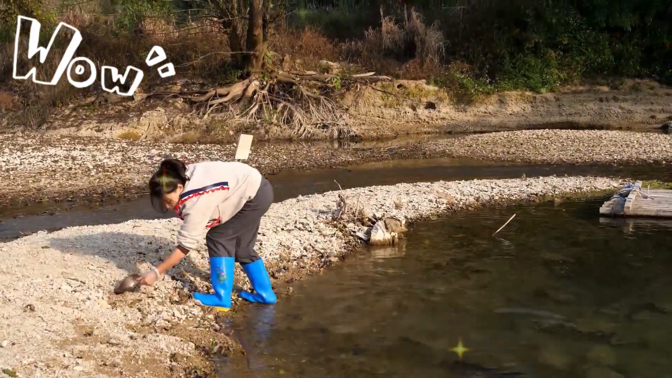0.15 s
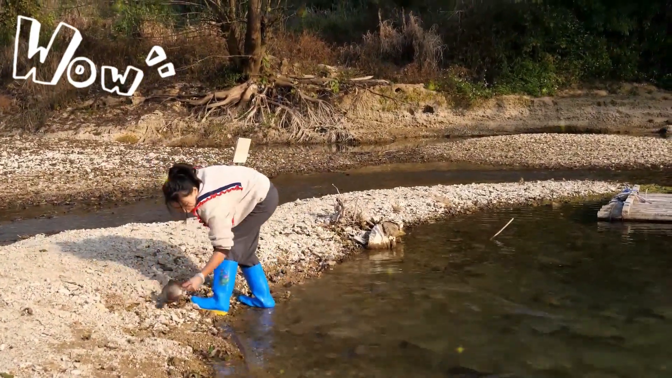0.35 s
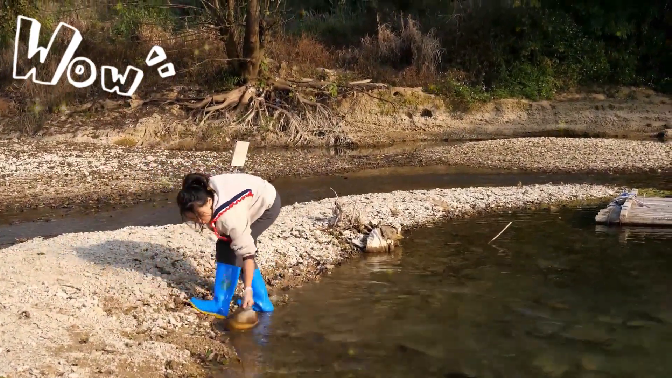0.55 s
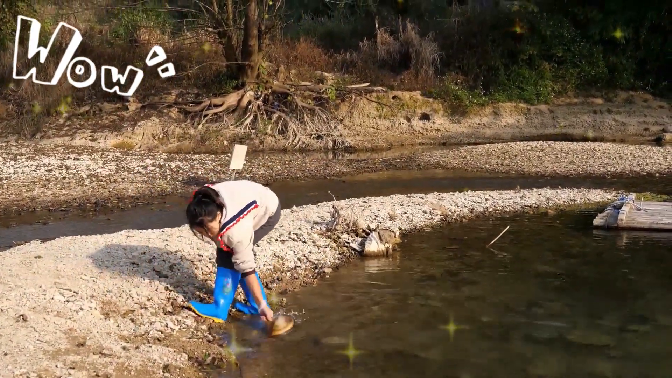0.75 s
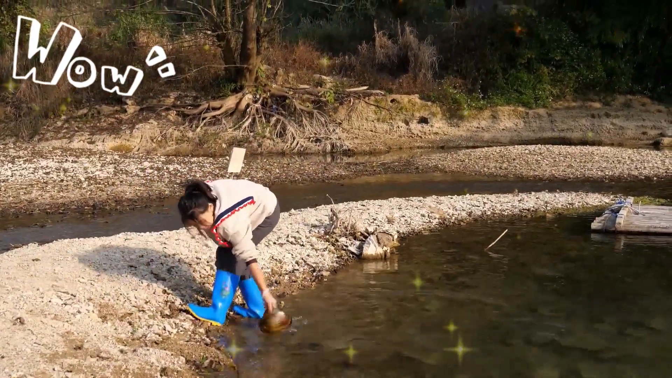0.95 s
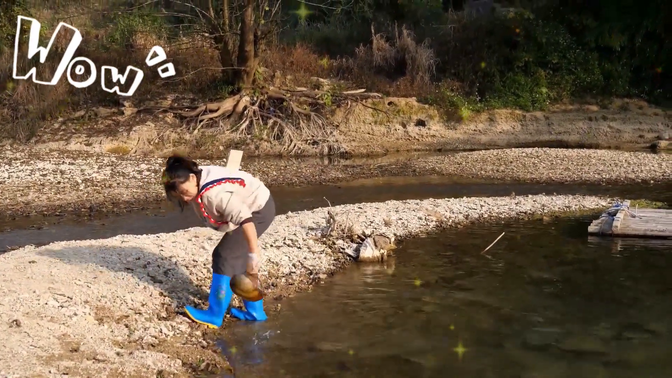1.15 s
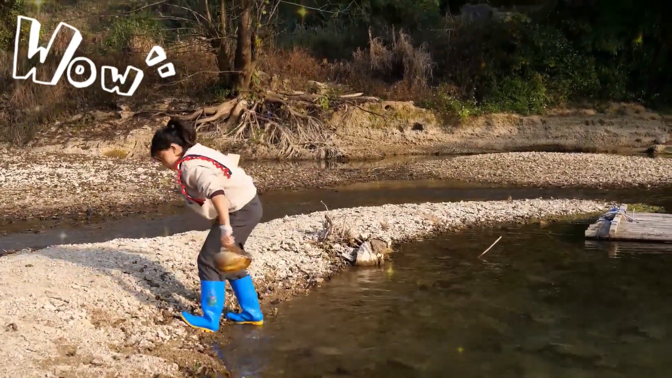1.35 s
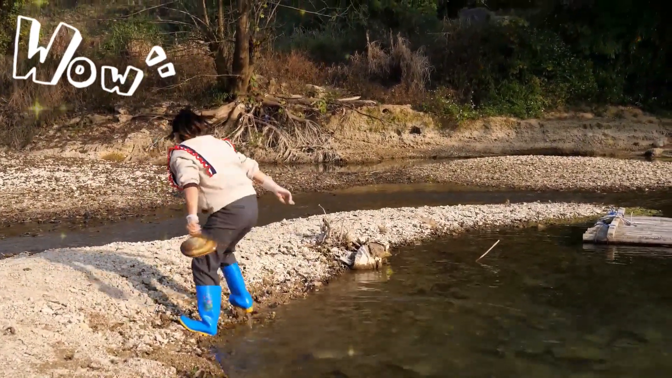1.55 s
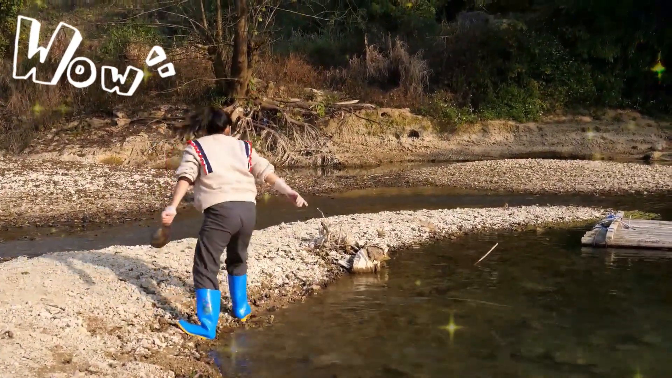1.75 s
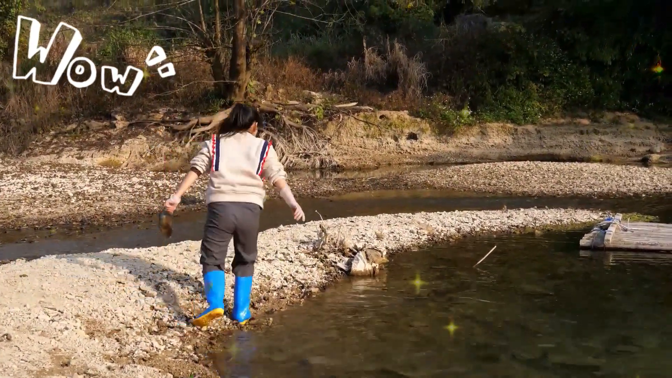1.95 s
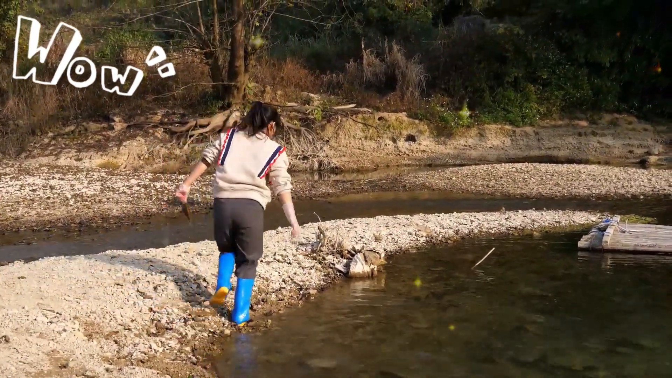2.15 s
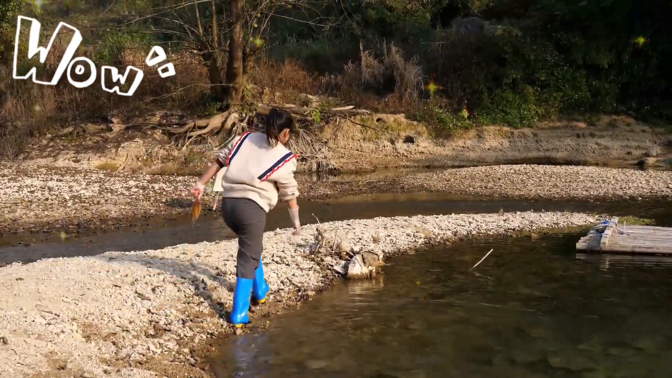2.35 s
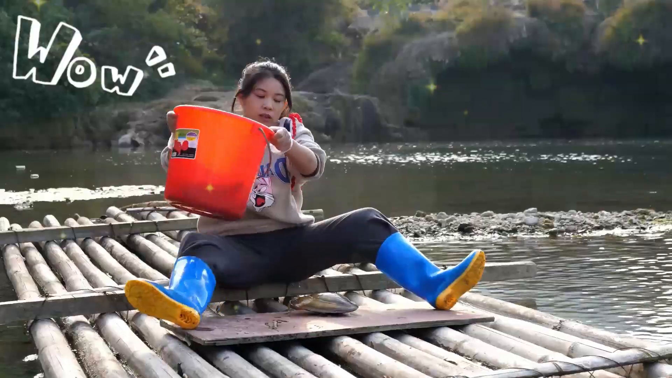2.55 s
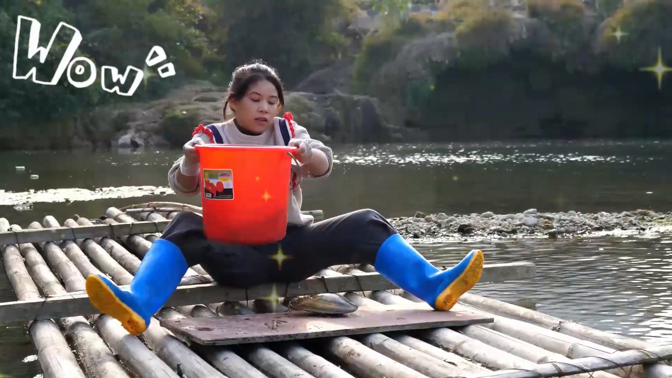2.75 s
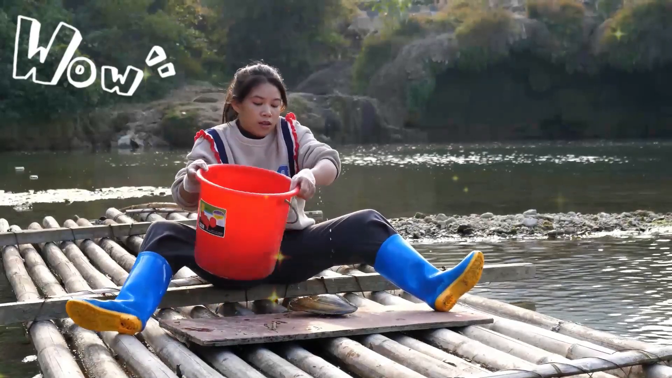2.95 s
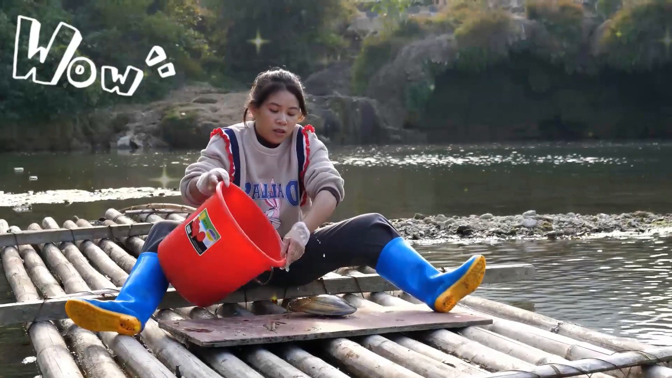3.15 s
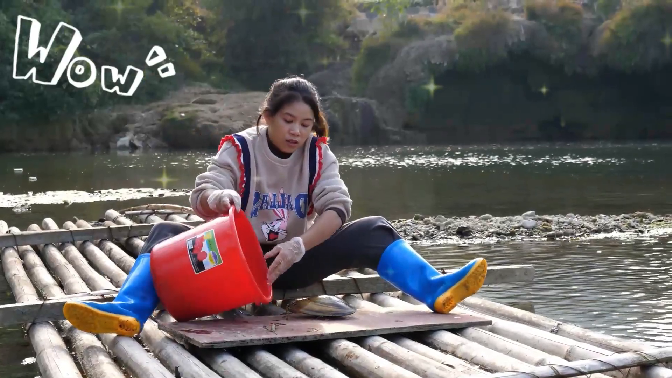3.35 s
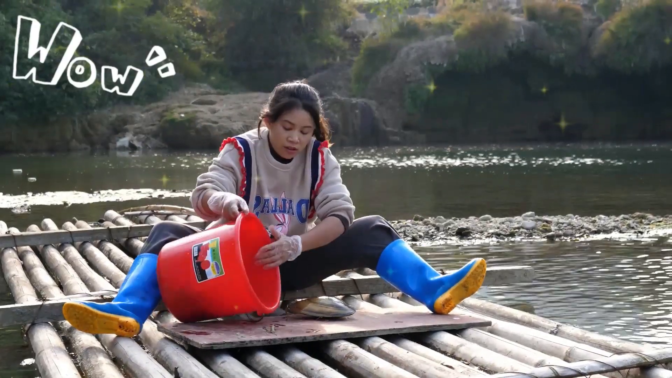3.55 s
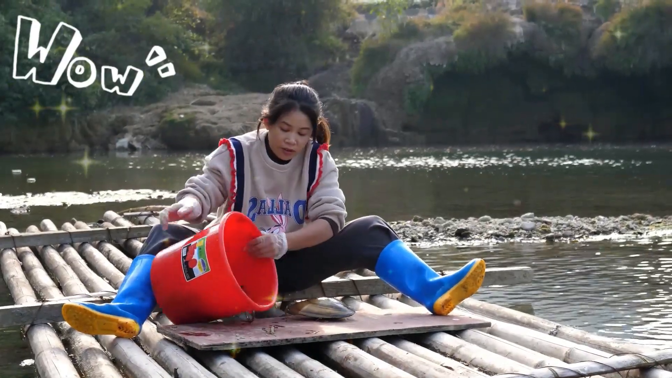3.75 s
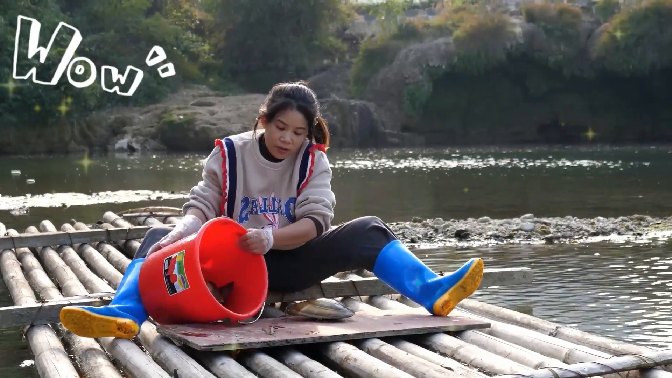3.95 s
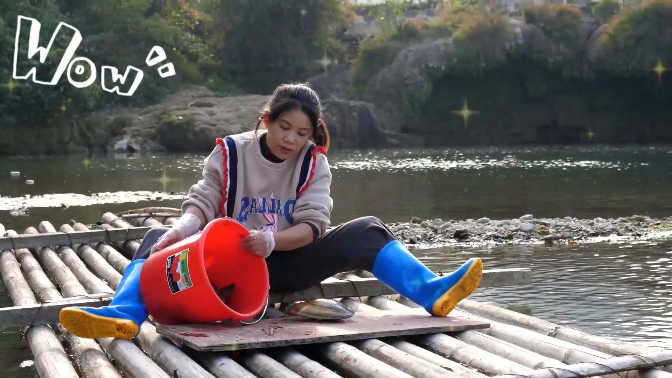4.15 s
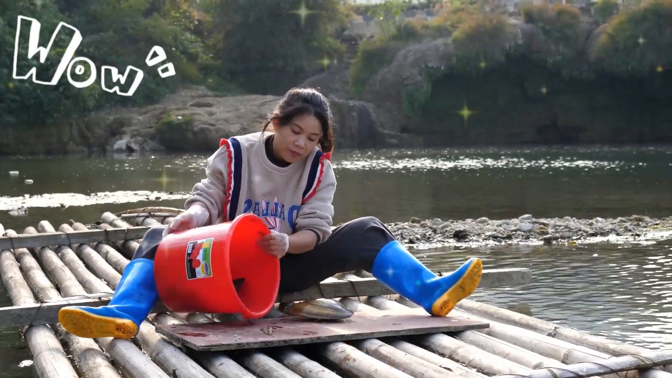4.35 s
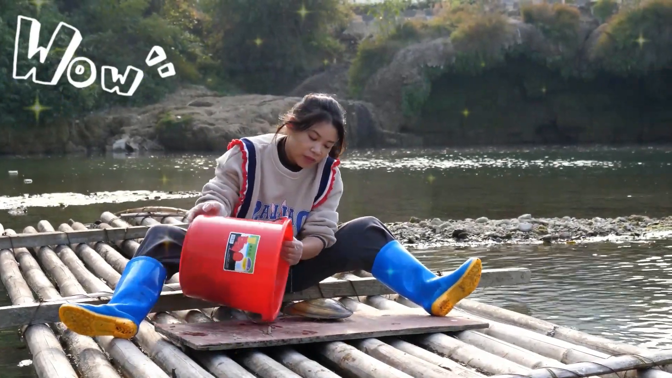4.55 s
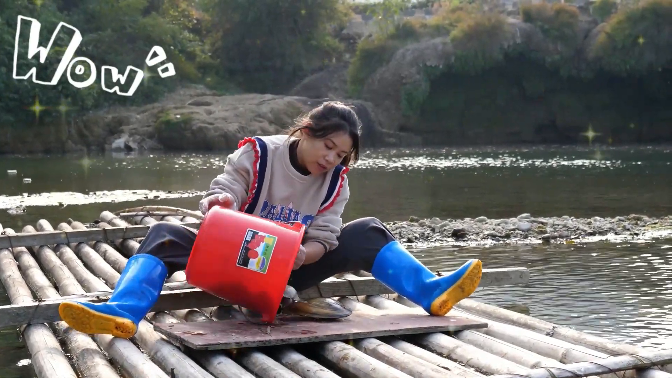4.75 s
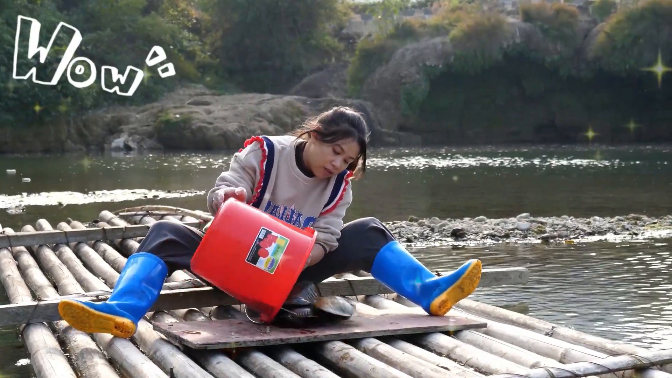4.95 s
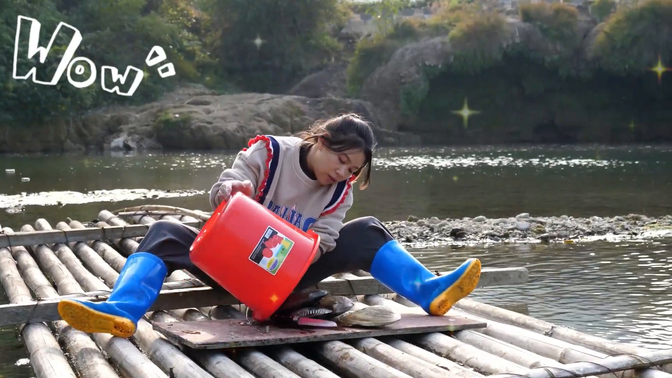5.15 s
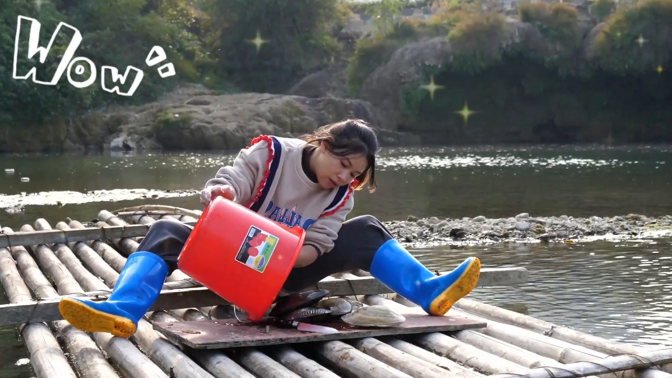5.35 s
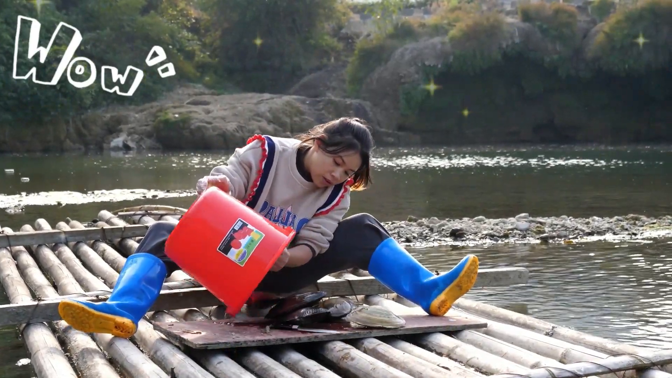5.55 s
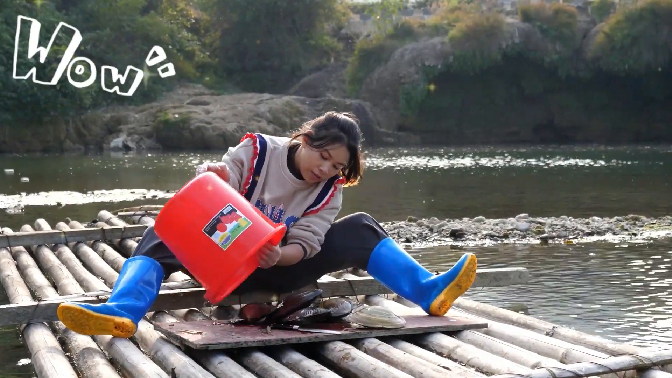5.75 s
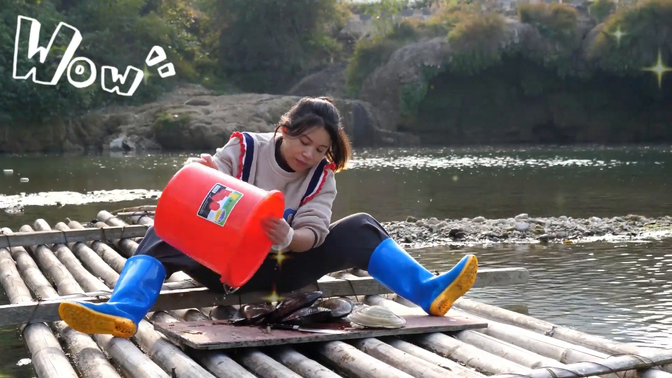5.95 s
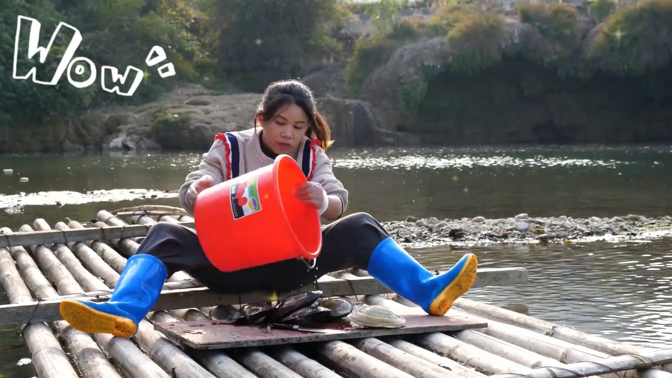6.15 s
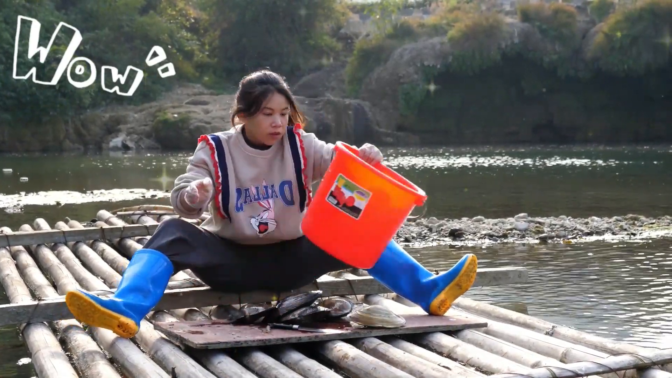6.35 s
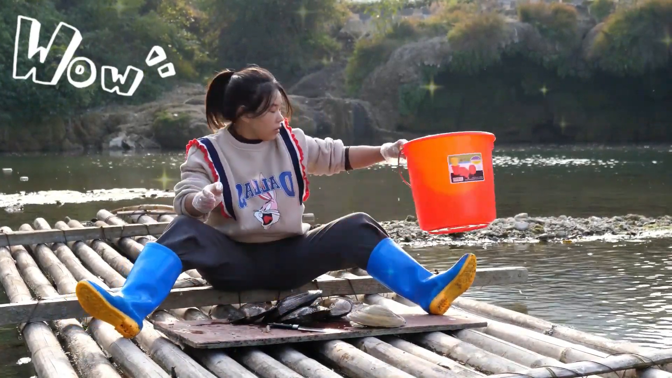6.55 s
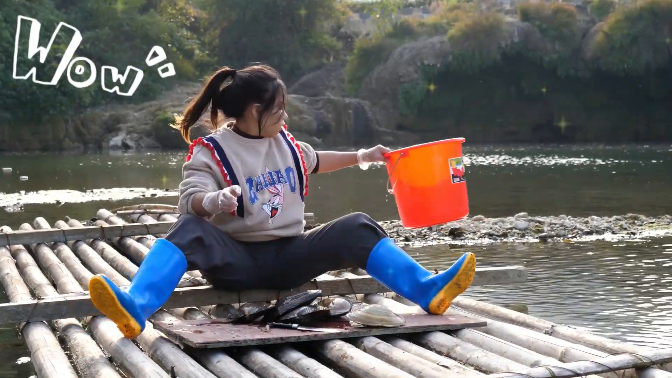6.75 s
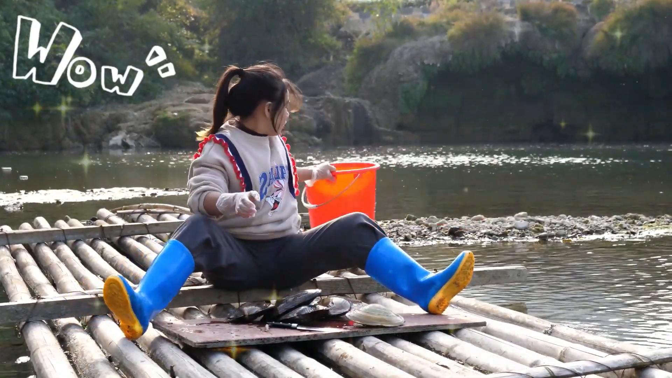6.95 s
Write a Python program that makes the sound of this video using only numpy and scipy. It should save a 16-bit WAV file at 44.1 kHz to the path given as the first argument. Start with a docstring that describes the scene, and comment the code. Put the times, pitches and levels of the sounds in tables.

```python
"""A river hisses softly throughout: bands of noise. At first a breeze rumbles on the microphone as low noise,
boots shift in wet gravel (grains exciting stone resonances), drops ring as bubbles with rising pitch,
and single pebbles click as puffs of noise. Then, on a bamboo raft, big mussel shells slide (swelling hiss)
and knock in a plastic bucket and tumble onto a wooden board: runs of contacts strike the modes of bucket,
board and shells. The last knocks ring the emptied bucket."""
import sys
import numpy as np
from scipy import signal
from scipy.io import wavfile

SR = 44100
rng = np.random.default_rng(int(sys.argv[2]) if len(sys.argv) > 2 else 0)


def pcm_store(signal):
    """Save signal as 16-bit PCM."""
    levels = np.round(np.clip(np.atleast_2d(signal), -1, 1) * 32767)
    wavfile.write(sys.argv[1], SR, levels.astype(np.int16).T)


N = 313096

# Ends of the handling stages in seconds: lifted, tilted on the knee, rim on the board, pouring;
# after the last the bucket is swung away empty.
STAGE_ENDS = (3.1, 4.4, 4.85, 6.2)


def from_db(db):
    """Logarithmic level: decibels become an amplitude gain."""
    return 10 ** (np.asarray(db) / 20)


def rms_one(x):
    """Normalisation: the signal is scaled to an rms of 1."""
    return x / np.sqrt(np.mean(x ** 2) + 1e-20)


def gains(tables):
    """Level envelopes: dB columns are interpolated in time and become gains, all but silent outside each table."""
    t = np.arange(N) / SR
    total = 0
    for table in tables:
        s, *columns = np.transpose(table)
        total = total + np.array([from_db(np.interp(t, s, column, -120, -120)) for column in columns])
    return total


def at_hz(points, hz):
    """Spectral interpolation: a curve is read on a log-frequency axis."""
    table_hz, values = np.array(points)[:, 0], np.array(points)[:, 1]
    return np.interp(np.log(hz), np.log(table_hz), values)


def sides(balance_db):
    """Intensity stereo: a level difference, left over right, becomes two gains."""
    return from_db(np.array([[.5], [-.5]]) * balance_db)


def band_pass(x, order, band_hz):
    """Band limitation: only the range between two frequencies passes."""
    return signal.sosfilt(signal.butter(order, band_hz, "band", fs=SR, output="sos"), x)


def resonance(x, hz, width_hz):
    """Driven resonator: a two-pole band-pass of gain 1 at its top."""
    r = np.exp(-np.pi * width_hz / SR)
    return signal.lfilter(np.array([1, 0, -1]) * (1 - r * r) / 2, [1, -2 * r * np.cos(2 * np.pi * hz / SR), r * r], x)


def ring(clicks, hz, t60):
    """Impulse response of a damped mode: a unit click starts a dying sine of initial height 1."""
    r = from_db(-60 / (max(t60, .001) * SR))
    w = 2 * np.pi * hz / SR
    return signal.lfilter([0, np.sin(w)], [1, -2 * r * np.cos(w), r * r], clicks + 1e-18)


def touches(per_s, uneven_db):
    """Poisson-like contacts: random sample indices and signed sizes of rms 1."""
    at = np.flatnonzero(rng.random(N) < per_s / SR)
    sizes = from_db(uneven_db * np.minimum(rng.exponential(1, N), 4)) * rng.choice([-1, 1], N)
    return at, rms_one(sizes[at])


def drift(rate):
    """Low-passed noise: a slow random curve of rms 1, its bandwidth set by the rate in Hz."""
    step = 40   # samples between computed points
    r = np.exp(-2 * np.pi * step * rate / SR)
    slow = signal.lfilter([1], [1, -2 * r, r * r], rng.standard_normal(N // step + 2002))[2000:]
    return np.interp(np.arange(N) / step, np.arange(len(slow)), rms_one(slow))


def banded_noise(spectrum, top_hz, patchy_db, rate):
    """Partly coherent noise: half-octave bands with own level, flicker and left-right likeness; rms 1."""
    # Left-right likeness. Each row: frequency in Hz, correlation of the sides (1 is alike).
    likeness = [(60, 0.99), (180, 1), (550, 0.98), (1650, 0.42), (4970, 0.76), (15000, 0.79)]
    out, together = 0, drift(rate / 4)
    edges = 28 * 2 ** np.arange(0, 9.6, .5)
    white = rng.standard_normal((2, 2, N))
    for k, low in enumerate(edges[edges < top_hz]):
        # neighbouring bands use different noise
        mid, side = band_pass(white[k % 2], 2, [low, min(low * np.sqrt(2), .45 * SR)])
        hz = low * 2 ** .25
        alike = np.clip(at_hz(likeness, hz), -1, 1)
        gain = from_db(at_hz(spectrum, hz) + patchy_db * (.5 * together + drift(rate)))
        out = out + gain * (np.sqrt(1 + alike) * mid + np.sqrt(1 - alike) * side * [[1], [-1]])
    return rms_one(out)


def river():
    """Broadband flow noise: a soft hiss whose bands flicker slightly."""
    # River spectrum. Each row: frequency in Hz, level in dB per Hz (relative).
    river_colour = [(40, -48), (101, -8.5), (198, -10), (275, -7), (476, -12), (567, -7), (1430, -8),
                    (3800, -15.5), (14700, -28), (15800, -53)]
    return from_db(-58) * banded_noise(river_colour, top_hz=16000, patchy_db=.9, rate=24)


def breeze():
    """Wind noise: low-frequency pressure flutter at the microphone, rising and falling in gusts."""
    # Gust envelope. Each row: time in seconds, level in dB.
    gusts = [(0.0, -58.5), (0.17, -72), (0.5, -54), (1.44, -57.5), (1.46, -50.5), (2.01, -54),
             (2.29, -49.5), (2.47, -60.5), (2.51, -48), (2.7, -86)]
    # Wind spectrum. Each row: frequency in Hz, level in dB per Hz (relative).
    wind_colour = [(15, -61), (25, -25), (49, -13), (107, 4), (154, 6.5), (307, -27.5), (425, -7),
                   (500, -17)]
    return gains([gusts])[0] * banded_noise(wind_colour, top_hz=500, patchy_db=2.5, rate=23.0)


def tread():
    """Exponential pressing and release: crunch and grit gains swell, hold and fade over a faint shuffle."""
    # Boots pressing into wet gravel. Each row: start in seconds, hold in seconds,
    # crunch in dB before the gain of the gravel, grit in dB re crunch.
    steps = [(0.0, 0.0039, -51, -2), (0.678, 0.12, -57.5, -5.5), (1.033, 0.036, -41.5, -20),
             (1.053, 0.013, -52, 1), (1.13, 0.0044, -46, -24), (1.25, 0.11, -53, -11),
             (1.51, 0.011, -50.5, -9), (1.859, 0.026, -43.5, -14), (2.077, 0.0088, -50, 1.5),
             (2.121, 0.005, -43.5, -2.5)]
    # The stones never quite rest while the boots shift: start and end in seconds.
    shuffle_start, shuffle_end = (.6, 2.45)
    shuffle = (shuffle_start, shuffle_end - shuffle_start, -61, -12)
    press_db_per_s, lift_db_per_s = 700, 246   # swell before and fading after each hold
    t, power = np.arange(N) / SR, np.zeros((2, N))
    for s, hold, level_db, grit_db in [*steps, shuffle]:
        shape_db = -press_db_per_s * np.maximum(s - t, 0) - lift_db_per_s * np.maximum(t - s - hold, 0)
        power += from_db(np.maximum(shape_db, -200) + level_db + np.array([[0], [grit_db]])) ** 2
    return np.sqrt(power)


def gravel():
    """Granular excitation: dense grains set many short stone resonances ringing, dull crunch and bright grit."""
    out = 0
    # lowest and highest stone Hz, grains per s, cycles a stone rings down 60 dB
    layers = [(1010, 2260, 2500, 5.5), (2900, 12100, 3500, 6.4)]
    for gain, (low_hz, high_hz, per_s, cycles) in zip(tread(), layers):
        at, sizes = touches(per_s=per_s, uneven_db=4.5)
        dealt, layer = rng.integers(0, 12, len(at)), 0
        for k, hz in enumerate(np.geomspace(low_hz, high_hz, 12)):
            clicks = np.zeros(N)
            clicks[at[dealt == k]] = sizes[dealt == k]
            # small stones ring briefly but sharply
            layer = layer + (hz / low_hz) ** 1.12 * ring(clicks, hz, cycles / hz)
        out = out + gain * rms_one(band_pass(layer, 2, [low_hz * .7, high_hz * 1.15]))
    return from_db(1.5) * out


def drips():
    """Bubble resonance: a drop traps a bubble whose pitch rises as it dies; the broken surface roughens it."""
    # Drops and small splashes. Each row: start in seconds, bubble level in dB before the bank filter,
    # starting pitch in Hz, decay by 60 dB in seconds (at least 0.004 s is used).
    drops = [(0.063, -34, 2350, 0.013), (0.069, -36, 2040, 0.016), (0.077, -34.5, 1870, 0.024),
             (0.736, -45, 1420, 0.069), (0.764, -36.5, 1450, 0.025), (0.807, -43, 1400, 0.054),
             (0.833, -35.5, 1240, 0.014), (0.919, -46, 677, 0.069), (0.931, -49, 1310, 0.18),
             (0.968, -51.5, 548, 0.14), (1.008, -31.5, 1045, 0.12), (1.089, -45.5, 500, 0.11),
             (1.037, -32, 2500, 0.027), (1.044, -34, 2450, 0.021), (1.011, -31.5, 1370, 0.069),
             (1.055, -35, 1450, 0.02), (1.066, -41, 4200, .015), (1.07, -40, 7050, 0.016),
             (1.075, -42, 7040, 0.013), (1.093, -36.5, 3010, 0.03), (1.139, -30.5, 2230, 0.017),
             (1.14, -35.5, 1020, 0.022), (1.24, -47.5, 1150, 0.066), (1.257, -36.5, 3000, 0.02),
             (1.277, -38.5, 2900, 0.022), (1.351, -45, 1360, 0.061), (1.697, -47, 1810, 0.03),
             (2.0, -40, 530, 0.037), (2.335, -43, 703, 0.067)]
    out, t = np.zeros(N), np.arange(4000) / SR
    for (s, level_db, hz, t60), noise in zip(drops, rng.standard_normal((len(drops), 4000))):
        rough = 1 + 0.035 * rms_one(signal.lfilter([1], [1, -.9], noise))
        bubble = np.sin(2 * np.pi * hz * t * (1 + 1.66 * t))
        # a 6 ms tick, 15 dB below the bubble, as the drop breaks the surface
        tick = from_db(level_db - 15 - 60 * t / .006) * noise
        i = round(s * SR)
        out[i:i + 4000] += tick + from_db(level_db - 60 * t / max(t60, .004)) * rough * bubble
    return out


def pebbles():
    """Damped impact noise: each click is a puff of noise a few ms long around the stone's pitch."""
    # Single pebbles. Each row: start in seconds, peak in dB before the bank colouring, centre in Hz.
    clicks = [(0.065, -43.5, 3100), (0.685, -37.5, 3420), (1.14, -44, 2570), (1.207, -43, 2480),
              (1.226, -41, 7240), (1.399, -31.5, 6330), (1.521, -45, 2450), (1.549, -28.5, 6700),
              (1.6775, -43, 7340), (1.81, -50, 5200), (1.939, -37, 6000), (1.964, -38.5, 9300),
              (2.069, -32.5, 3300), (2.0771, -32.5, 2420), (2.107, -38, 2520), (2.138, -25.5, 4370),
              (2.177, -43, 7090), (2.3302, -37.5, 2780)]
    out = np.zeros(N)
    for (s, level_db, hz), puff in zip(clicks, rng.standard_normal((len(clicks), 1200))):
        puff = puff * from_db(-60 * np.arange(1200) / SR / 0.019)   # 60 dB in 19 ms
        puff = band_pass(puff, 1, [hz / 1.31, min(hz * 1.25, 18000)])
        i = round(s * SR)
        out[i:i + 1200] += from_db(level_db) * puff / np.abs(puff).max()
    return out


def bank_colour(x):
    """Parallel resonators: fixed pitches stand out of the stone sounds from the bank."""
    # Resonance pitches in Hz, their shared width in Hz, their gain in dB.
    peaks_hz, width_hz, peak_db = (2390, 3230, 4580, 5460, 6370, 7120, 8420), 245, -0.5
    return x / 2 + from_db(peak_db) * sum(resonance(x, hz, width_hz) for hz in peaks_hz)


def slides():
    """Friction noise: a shell sliding along plastic hisses around one broad resonance, swelling and fading."""
    # Sliding shells. Each row: start in seconds, length in seconds, centre in Hz, width in octaves,
    # level in dB before the swell.
    strokes = [(2.472, 0.083, 1550, 1.35, -49), (2.504, 0.025, 3500, 3.5, -44), (3.263, 0.12, 1880, 1, -56),
               (4.505, 0.23, 1460, 0.83, -53), (3.66, .09, 7900, 1, -56.5),
               (4.003, 0.036, 8800, 0.49, -58.5), (5.321, 0.11, 3540, 0.26, -46)]
    out = np.zeros(N)
    for (s, length, hz, octaves, level_db), hiss in zip(strokes, rng.standard_normal((len(strokes), SR // 4))):
        half_width = 2 ** (octaves / 2)
        hiss = rms_one(band_pass(hiss, 2, [hz / half_width, min(hz * half_width, 16000)]))
        n, i = min(int(length * SR), SR // 4), round(s * SR)
        swell = np.sin(np.pi * np.sqrt(np.arange(n) / n))
        out[i:i + n] += from_db(level_db) * swell * hiss[:n]
    return out


def stage(s):
    """Changing boundary conditions: the six stage columns at given times."""
    # One row per handling stage. Each row: boom in dB re knock, boom pitch in Hz, low rattle pitch in Hz,
    # clacking rattle pitch in Hz and level in dB, octaves of board modes a knock reaches.
    stage_rows = [(-32, 127, 423, 1700, 3.5, 0.34), (-25.5, 188, 280, 1540, 5, 0.55),
                  (-17, 129, 500, 1650, 8, 0.61), (-33, 137.6, 485, 1240, 2.5, 0.26),
                  (-16.5, 147, 470, 1850, 5.5, 0.29)]
    return np.moveaxis(np.array(stage_rows)[np.searchsorted(STAGE_ENDS, s)], -1, 0)


def struck(modes, at, sizes, shell, pitches, near_hz, reach, spread_db):
    """Modal excitation: each contact drives most the modes near its spot's pitch; small shells lie higher."""
    # Stereo place of the shells. Each row: frequency in Hz, left over right in dB.
    shell_balance = [(130, 1.5), (400, 0.5), (1000, -0.6), (2200, -4), (4500, -4), (8000, 0.3)]
    out = np.zeros((2, N))
    for hz, level_db, t60 in modes:
        off_db = np.maximum(-6 * np.nan_to_num(np.log2(hz / near_hz) / reach) ** 2, -13.5)
        strength = sizes * from_db(level_db + off_db + spread_db * rng.standard_normal(len(at)))
        rung = 0
        for k, pitch in enumerate(pitches):
            mine, clicks = shell % len(pitches) == k, np.zeros(N)
            np.add.at(clicks, at[mine], strength[mine])
            rung = rung + ring(clicks, hz * pitch, t60)
        # a mode takes a cycle or two to swell
        out += resonance(rung, hz, 0.63 * hz) * sides(at_hz(shell_balance, hz))
    return out


def rims(cycles):
    """Dense high modes: short rim resonances, evenly spread in log pitch."""
    # Shell rim spectrum. Each row: frequency in Hz, level in dB per Hz.
    rim_colour = [(2900, -5), (3500, -8.5), (4300, -5), (5500, -10.5), (8500, -11), (11000, -18),
                  (15000, -39)]
    # wider spacing of the higher modes is made up in level
    return [(hz, at_hz(rim_colour, hz) + 10 * np.log10(hz / 3000), cycles / hz)
            for hz in np.geomspace(2900, 13500, 13)]


def shells():
    """Modal impacts: a blow is a quick dying run of contacts as the shell rocks; loose rattle fills in between."""
    # Shell blows. Each row: start in seconds, board knock in dB, shell clack and rim tick in dB re knock
    # (all before the trims below), knock, clack and tick pitch in Hz, pace of the run in ms.
    blows = [(2.522, -18, -12.5, -21.5, 500.0, 1220, 5780.0, 4),
             (2.617, -38, -2, -20, 443, 1600.0, 7720.0, 3.5), (2.742, -34, 4, -16, 990, 2520.0, 3600, 6.5),
             (2.767, -45.5, 4.5, -6, 820, 1300, 6370, 6.5), (2.855, -24, -3, -37, 550, 1610.0, 5040.0, 4.3),
             (3.397, -14.5, -20, -41, 265, 1630.0, 8090.0, 5.1),
             (3.407, -22, -17.5, -47, 334, 1360.0, 6410.0, 3.9),
             (3.434, -16, -29, -28, 312.0, 1550.0, 4680.0, 5.2),
             (3.473, -23, -5, -15.5, 478, 2120.0, 6790.0, 5.7),
             (3.491, -18, -4, -20.5, 330, 1980, 6210.0, 4.1),
             (3.522, -21, -20, -51, 323, 1280.0, 5900.0, 7.2),
             (3.539, -10.5, -4.5, -33, 430, 1270.0, 4140.0, 4.57),
             (3.612, -38, 4, -27, 296, 1560.0, 9390.0, 3.9),
             (3.622, -28, 1.5, -4.5, 267.0, 2260.0, 7620.0, 6.8),
             (3.667, -42, 15, 8, 310.0, 2590.0, 5500, 4.8),
             (3.717, -15.5, -10, -25, 347, 1350, 5140.0, 4.4),
             (3.733, -22.5, -2, -7, 280, 1870.0, 7800.0, 7.6),
             (3.756, -24, -5.5, -13, 312, 1270.0, 8310.0, 3.02),
             (3.833, -34, -12, -38.0, 354, 1380.0, 6470.0, 5.1),
             (3.88, -30.5, -31, -46.0, 292, 1600.0, 7680.0, 4.7),
             (3.934, -23, -12, -25, 275, 1250, 6000, 4.16), (3.941, -29, 3.5, 6.5, 380, 2640, 10000, 2.37),
             (3.994, -29, -3, -17, 333, 2000.0, 8550.0, 6),
             (4.062, -31.5, -19, -35.0, 244, 1710.0, 7120.0, 6.5),
             (4.098, -40, -22, -40, 230, 1500, 7000, 6.0), (4.176, -40.5, -9, -18, 284, 1980, 7690.0, 4.3),
             (4.63, -20, 4.5, -9.5, 500.0, 1650, 5600.0, 5.1),
             (4.717, -16.5, -4, -17, 410, 2490.0, 4000, 3.9),
             (4.813, -27, 2.5, -35.0, 613, 1810.0, 5800, 4.1),
             (4.88, -22, 10.5, -7, 610, 1840, 7420.0, 5.9),
             (4.891, -12, -6.5, -22, 360, 1790.0, 4390.0, 5.5),
             (4.913, -13.5, -5, -10, 394, 1980.0, 8350, 3.5), (4.931, -10.5, 0, -12, 365, 1720, 4630, 4.1),
             (4.949, -7, -11, -18.5, 370, 1230.0, 7880.0, 3.94),
             (4.962, -7.5, -7.5, -13.5, 355, 2360.0, 8100, 4.33),
             (4.996, -17, -10, -31, 401.0, 1700.0, 5620.0, 4), (5.019, -12.5, 4, -15, 670, 1580, 5800, 3.7),
             (5.046, -18.5, -4, -23, 630, 1610.0, 5480.0, 4.7),
             (5.062, -22, 3, -13.5, 630, 1273, 6580.0, 5), (5.083, -21, 2, -22, 805, 1350.0, 5780.0, 4.5),
             (5.102, -11, -9.5, -24, 417, 1790.0, 6360.0, 4.1),
             (5.123, -3, -10, -37.0, 410, 1720, 3340.0, 4.7), (5.146, -12, -6, -14, 405, 1380, 8320.0, 4.2),
             (5.183, -29, 2, -16, 400.0, 2280.0, 5040.0, 4.4),
             (5.201, -15, -32, -35, 446, 1380.0, 5540.0, 3.7),
             (5.22, -16, -8, -25, 440, 1250.0, 6230.0, 4.1),
             (5.266, -14, -24, -20.5, 370, 1510.0, 8290.0, 4.5),
             (5.298, -9, 1, -15.5, 800, 1610.0, 4570.0, 4.4),
             (5.339, -19, -6, -19, 330, 1590.0, 3980.0, 5.4),
             (5.376, -18, -19, -39.0, 320, 1160.0, 4080.0, 4.3),
             (5.494, -15, -6, -34, 813, 1400.0, 7880.0, 3.2),
             (5.509, -19, -3, -17, 398, 1530.0, 5280.0, 3.9),
             (5.562, -18.5, -4, -20, 830, 1260.0, 4950, 4.3),
             (5.58, -19.5, -5.5, -13, 800, 1910.0, 4950, 4.3),
             (5.64, -26.5, -34, -41, 353, 1550.0, 7100, 3.6), (5.725, -25, -6, -26, 416, 1200.0, 5030, 4.4),
             (5.752, -3, -10.5, -23.5, 514, 1190, 6550.0, 4.9),
             (5.785, -14, -7.5, -20, 335, 1350, 4690.0, 7.2),
             (5.811, -11, -11.5, -27.5, 493, 1300, 5300.0, 5.6),
             (5.853, -15.5, -15, -34, 388, 1110.0, 6010.0, 5.4),
             (6.404, -15, 5, -13, 500.0, 2300, 5450, 4.5),
             (6.413, -19.5, 1.5, -44, 490, 1860, 3240.0, 4.22),
             (6.458, -32, -7, -22, 500.0, 2080.0, 4530.0, 5.1),
             (6.571, -17.5, 1, -15, 560, 2150.0, 4870, 4.07),
             (6.643, -23, -3.5, -18, 560, 2200.0, 3700, 3.77),
             (6.687, -29, 1, -19.5, 557, 2100, 3770.0, 4.05)]
    # Sliding and rattling, one curve per handling. Each row: time in seconds, low and bright rattle in dB.
    handlings = [
        [(2.52, -36.5, -72), (2.658, -57, -62.5), (2.728, -53.5, -57.5), (2.854, -59, -70), (2.97, -58, -77)],
        [(3.39, -41, -56), (3.448, -30.5, -59.5), (3.58, -32, -54.5), (3.786, -55, -61), (3.952, -47.5, -58),
         (4.136, -60.5, -64.5), (4.3, -67, -64.5)],
        [(4.63, -59, -49.5), (4.686, -47.5, -54), (4.804, -41, -48.5), (4.948, -29, -49.5), (5.068, -28, -46.5),
         (5.14, -31.5, -48), (5.47, -39, -58.5)],
        [(5.49, -26.5, -48), (5.552, -35, -61.5), (5.712, -55.5, -61.5), (5.89, -41.5, -56), (6.024, -54, -101),
         (6.08, -55, -69)],
        [(6.4, -41.5, -57), (6.448, -36.5, -63), (6.562, -62, -66), (6.594, -43, -68), (6.716, -44, -64),
         (6.82, -85.5, -68)],
    ]
    # Modes of bucket and raft boom, wooden board, and shell bowl.
    # Each row: frequency in Hz, level in dB, decay by 60 dB in seconds.
    boom_modes, board_modes, bowl_modes = [(72, -2, 0.036), (141.2, -4.5, 0.43), (189.4, 8, 0.092),
                                           (221, 10.5, 0.12)], [(273.6, -15.5, 0.59), (312, -10, 0.15),
                                                           (363.3, 3.5, 0.058), (413.3, 2, 0.068),
                                                           (452, -0.5, 0.051), (504, -7, 0.14),
                                                           (623.3, -2, 0.094), (676, 8.5, 0.045),
                                                           (770, 3.5, 0.089), (818, -11, 0.25)], [(1124, -5.5, 0.038),
                                                                          (1242, -2, 0.018),
                                                                          (1400, -7, 0.033),
                                                                          (1473, -12.5, 0.047),
                                                                          (1610, -3, 0.019),
                                                                          (1783, -2.5, 0.013),
                                                                          (1900, -25, 0.011),
                                                                          (2296, -5.5, 0.022),
                                                                          (2630, -12, 0.022)]
    # Hollow ring once the shells are out. Each row: frequency in Hz, level in dB, decay by 60 dB in seconds.
    hollow_modes = [(273, 3, 0.24), (468, -7, 0.084), (503, -4, 0.12), (614.6, 2, 0.081),
                    (680, -5.5, 0.086), (820, -5, 0.17), (1040, -11, .08)]
    # Pitch factors of large, middling and small shells.
    shell_sizes = (.96, 1.0, 1.045)
    contacts = 24   # in the run of one blow

    s, knock_db, clack_db, tick_db, knock_hz, clack_hz, rim_hz, gap_ms = np.transpose(blows)[:, :, None]
    chance = rng.random((len(s), 3, contacts))
    turns = (np.cumsum(chance[:, 0], axis=1) - chance[:, 0, :1]) / 2   # time into the run, in paces
    blow_at = ((s + turns * gap_ms / 1000) * SR).astype(int).ravel()
    landing = np.eye(contacts)[2]   # the third contact, where the shell lands flat, stands out
    # the run swells briefly, then dies
    swell = np.minimum(0.73 + turns / 0.89, 1)
    signs = np.sign(chance[:, 1] - .5)
    fading = from_db(knock_db - 3.0 - 1.94 * turns + 5.0 * landing) * swell * signs
    shell = np.repeat((chance[:, 2, 0] * 3).astype(int), contacts)

    low, bright = gains(handlings)
    boom_gain, clack_gain = from_db(stage(np.arange(N) / SR)[[0, 4]])
    rattle = np.array([low * boom_gain, low, np.sqrt(low * bright) * clack_gain, bright])   # clack lies between

    boom_db, boom_hz = stage(s)[:2]
    landing_db = 5.5 * landing - 0.2 * turns   # board and bucket answer mostly to that landing
    # later contacts are softer, so clack and tick fade faster than the knock
    # modes, pitch factors, blow dB, spot Hz, reach octaves (None: by stage), rattle dB, rattle contacts per s,
    # radiated band Hz
    bodies = [(boom_modes, [1], boom_db - 6.0 + landing_db, boom_hz, .45, 6.0, 300, [45, 400]),
              (board_modes, [1], landing_db - 16.5, knock_hz, None, -4.0, 220, [200, 1050]),
              (bowl_modes, shell_sizes, clack_db - 7.5 - 0.93 * turns, clack_hz, .7, -2.0, 350, [700, 3300]),
              (rims(cycles=30.5), shell_sizes, tick_db + 5.0 - 3.66 * turns, rim_hz, .8, -2.0, 2500, [2300, 12500])]
    out = 0
    for k, (modes, pitches, blow_db, spot_hz, reach, loose_db, per_s, band_hz) in enumerate(bodies):
        loose_at, loose = touches(per_s=per_s, uneven_db=2.0)
        busy = rattle[k, loose_at] > 1e-5
        loose_at = loose_at[busy]
        loose = loose[busy] * from_db(loose_db) * rattle[k, loose_at]
        loose_hz = [*stage(loose_at / SR)[1:4], np.full(len(loose), np.nan)][k]   # loose ticks drive all rims

        at = np.r_[blow_at, loose_at]
        sizes = np.r_[(from_db(blow_db) * fading).ravel(), loose]
        near_hz = np.r_[np.repeat(spot_hz, contacts), loose_hz]
        reach = reach or stage(at / SR)[5]
        which_shell = np.r_[shell, loose_at]   # chance timing picks the shell of a loose contact
        spread_db = 2.5 if len(pitches) == 1 else 4.5
        # the last knocks fall on the emptied bucket instead of the board
        empty = (at > STAGE_ENDS[-1] * SR) & (modes is board_modes)
        body = struck(modes, at, sizes * ~empty, which_shell, pitches, near_hz, reach, spread_db)
        if empty.any():
            body += struck(hollow_modes, at, sizes * empty, at, pitches, near_hz, 0.63, spread_db)
        out = out + band_pass(body, 3, band_hz)
    return out


def outdoors(x):
    """Discrete reflections: a few dull, thin echoes off raft and water, different on each side."""
    # Reflections. Each row: delay in seconds, level in dB, side (0 left, 1 right).
    reflections = [(.011, -17, 0), (.017, -17.5, 1), (0.039, -20, 0)]
    out, dull = x.copy(), band_pass(x.mean(axis=0), 1, [600, 5000])
    for s, level_db, side in reflections:
        lag = round(s * SR)
        out[int(side > .5), lag:] += from_db(level_db) * dull[:-lag]
    return out


def scene():
    """Superposition: bank a little right and dulled by distance, shells near the middle, river and breeze around."""
    bank = drips() + bank_colour(pebbles() + gravel())
    bank = signal.sosfilt(signal.butter(2, 9500, fs=SR, output="sos"), bank) * sides(-1.5)
    near = shells() + slides() * sides(-4.0)
    return outdoors(near + bank) + breeze() + river()


def record(dry):
    """Band-limited pickup: the microphone loses the deep bass, and the top is cut."""
    dry = signal.sosfilt(signal.butter(2, 60, "high", fs=SR, output="sos"), dry)
    return signal.sosfilt(signal.cheby2(12, 60, 16300, fs=SR, output="sos"), dry)


dry = scene()
out = record(dry)
pcm_store(out)
```